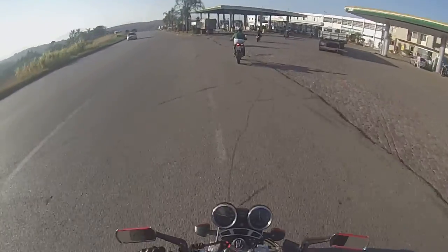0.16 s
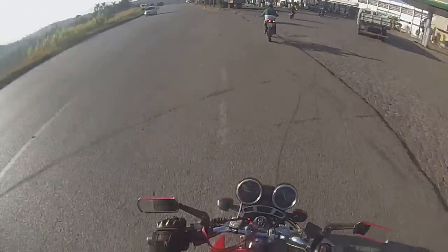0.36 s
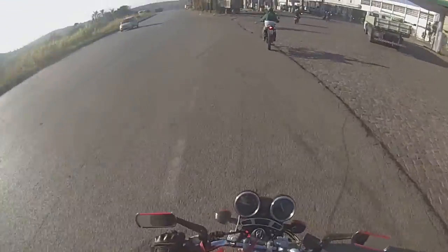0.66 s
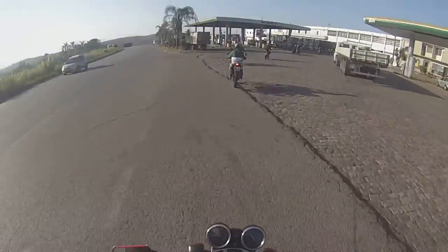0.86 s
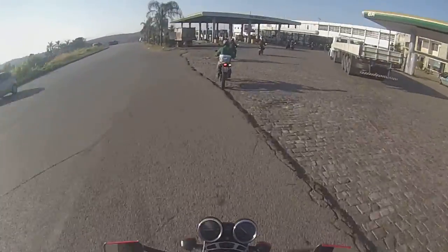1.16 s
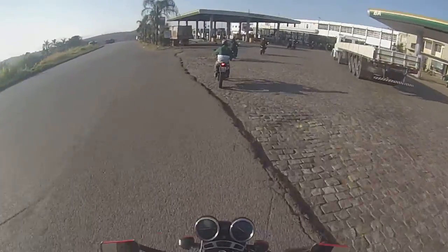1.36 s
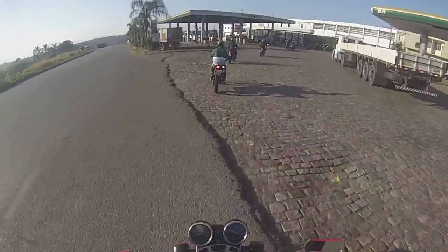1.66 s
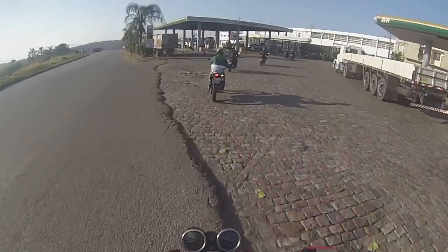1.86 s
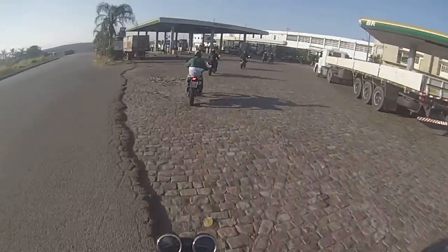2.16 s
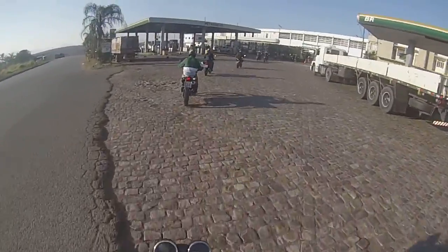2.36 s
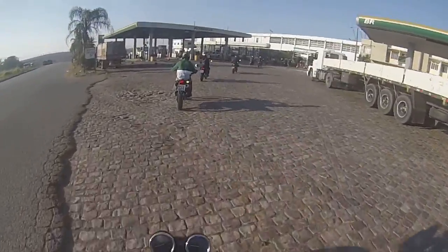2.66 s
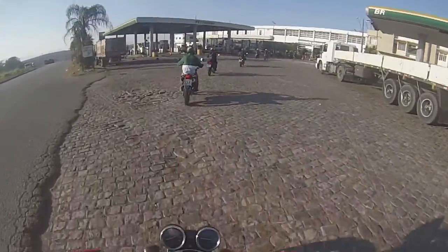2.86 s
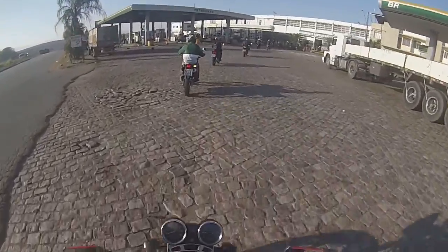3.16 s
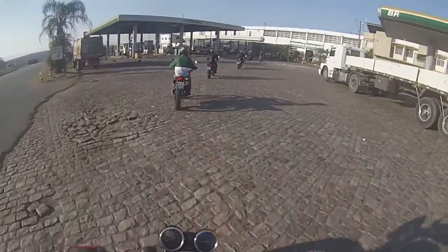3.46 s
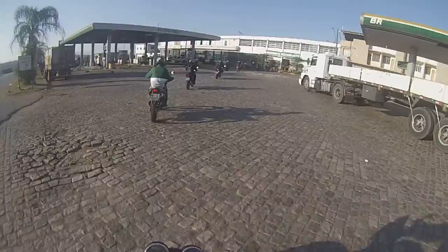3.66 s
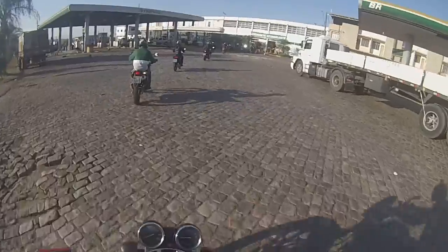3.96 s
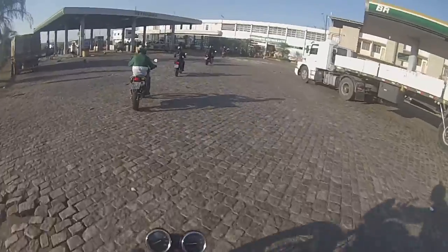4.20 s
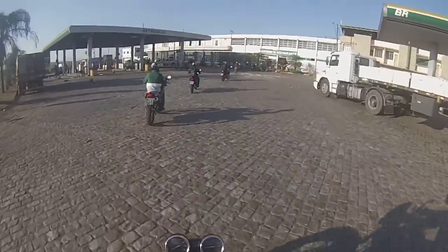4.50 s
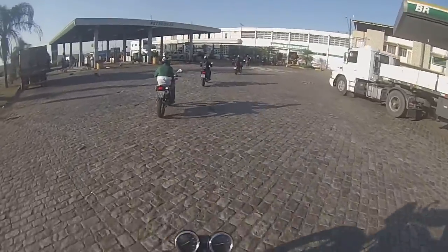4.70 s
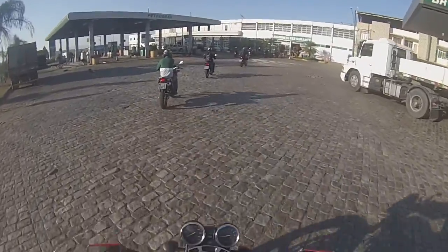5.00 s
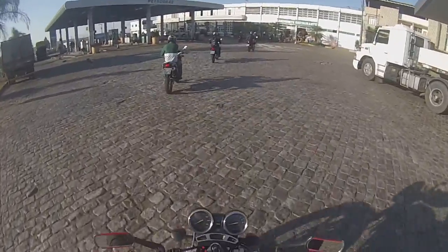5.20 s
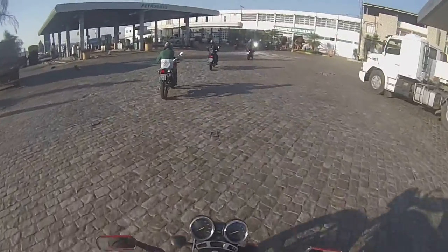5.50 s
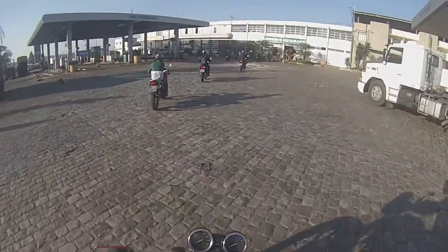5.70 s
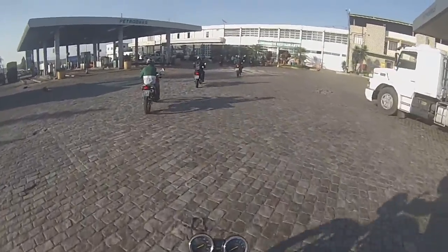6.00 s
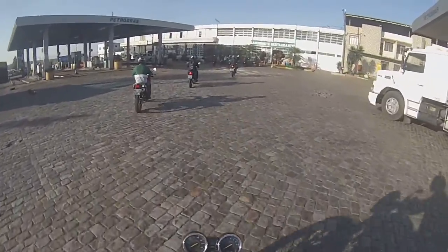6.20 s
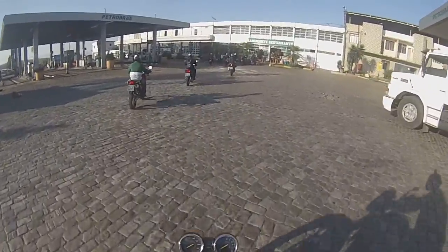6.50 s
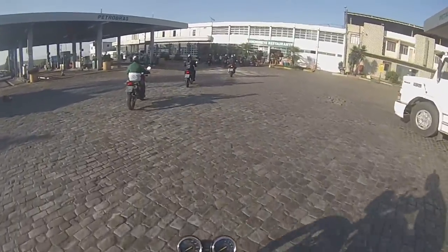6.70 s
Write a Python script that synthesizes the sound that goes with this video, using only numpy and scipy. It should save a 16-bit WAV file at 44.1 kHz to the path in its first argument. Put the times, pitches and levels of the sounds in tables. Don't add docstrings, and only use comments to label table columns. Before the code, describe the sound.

A motorcycle slows from smooth asphalt onto cobblestones, heard very close and muffled through a sealed camera housing on the helmet, with no room echo. At 0 s there is loud wind rush and a low, boomy engine hum, quickly weakening and sliding down in pitch. Around 0.7-1.8 s a car passes, its falling tyre whine over a broad roar; a dull knock lands near 1.2 s. The engine fades out between 2.1 and 2.4 s. Hollow wind tones keep blowing, with seam hiss. From about 1.7 s the stones shake the mount: low rumbling bumps, plastic ticks, thin metallic clinks and scuffs, densest around 2.2-2.9 and 3.3-4.1 s, with brief squeaky chirps, one strongest near 4.5 s. From 5 s the roll is slower, rattles sparser, and the wind becomes a higher, fluttering, pulsing whistle until the end near 7 s.

```python
import sys
import numpy as np
from scipy import signal
from scipy.fft import rfft, irfft, next_fast_len
from scipy.io import wavfile
from scipy.ndimage import uniform_filter1d

SR = 44100
rng = np.random.default_rng(int(sys.argv[2]) if len(sys.argv) > 2 else 0)


def gain_from_decibels(decibels):
    exponent = np.asarray(decibels, float) / 20
    return 10 ** exponent


def unload_audio(sound):
    columns = np.transpose(np.atleast_2d(sound))
    steps = np.round(np.clip(columns, -1, 1) * 32767)
    wavfile.write(sys.argv[1], SR, steps.astype(np.int16))


N = 302085
T = np.arange(N) / SR

# [multiple of the cycle, level/dB]
UPPER_ORDERS = [(5, -10), (6, -8), (8, -5), (9, -3), (10, -3), (11, -7), (12, -2), (13, -5), (15, -7)]
# [f/Hz, level/dB]
MOUNT_RESPONSE = [(70, -25), (80, -15), (85, -8), (90, -2.5), (97, 0), (113, -3.5), (122, -9), (132, -17),
                  (170, -24)]
# [f/Hz, level/dB per Hz]
HEAVE_SPECTRUM = [(3, -32), (6, -15), (14, 5), (27, 0.5), (40, -10.5), (55, -11), (70, -57)]
# [f/Hz, level/dB per Hz]
BOOM_SPECTRUM = [(45, -33), (60, -25), (78, 1), (95, 1), (110, -4), (130, -19), (155, -20.5), (200, -61)]
# [f/Hz, level/dB per Hz]
DRONE_SPECTRUM = [(88, -6), (150, -3), (193, -5), (225, -8), (281, 0.5), (354, -4), (440, -3), (520, -8.5),
                  (626, -8.5), (678, -7), (814, -7.5), (1000, -11.5), (1300, -4), (2200, -120)]
# [t/s, half length/s, heave level/dB, boom level/dB]
BUMPS = [(0, 0.27, -60, -24.5), (0.098, 0.089, -44, -40), (0.46, 0.11, -37, -27), (0.672, 0.21, -42.5, -39),
         (1.056, 0.078, -38.5, -50), (1.325, 0.097, -60, -29), (1.596, 0.24, -43.5, -32),
         (2.256, .1, -50, -40.5), (2.446, 0.21, -38, -40.5), (2.833, 0.074, -33, -35.5),
         (3.173, 0.064, -32, -48), (3.34, 0.24, -39, -45.5), (3.544, 0.044, -28.5, -40.5),
         (3.674, 0.054, -28.5, -42), (3.719, 0.039, -26, -39), (3.794, 0.028, -33, -34.5),
         (3.934, 0.038, -27, -38.5), (4.075, 0.028, -32.5, -52), (4.187, 0.064, -35.5, -37),
         (4.485, 0.039, -32, -43), (4.403, 0.036, -45, -42), (4.84, 0.032, -40, -39),
         (4.894, 0.2, -36.5, -40.5), (4.92, 0.031, -40, -39), (5.018, 0.043, -38, -41),
         (5.474, 0.035, -40, -42), (5.147, 0.077, -33.5, -52), (5.49, 0.64, -35, -50),
         (5.723, 0.07, -34.5, -37.5), (5.842, 0.081, -32, -55), (6.143, 0.074, -35, -43.5),
         (6.263, 0.024, -33, -52), (6.487, 0.029, -33.5, -34), (6.784, 0.22, -35.5, -45)]
# [t/s, half length/s, level/dB]
LULLS = [(2.49, 0.075, -4.5), (3.092, .04, -4), (3.448, 0.058, -1.5), (4.047, 0.033, -8), (4.583, .06, -1),
         (5.072, 0.024, -8), (5.17, .04, -3), (5.538, 0.064, -8), (5.922, 0.11, -3.5), (6.34, 0.057, -11),
         (6.607, 0.073, -5.5), (6.768, .025, -2)]
# [t/s, fast hiss share 0-1, slow cavity share 0-1]
PACE = [
    (0, 0.56, 0.43),
    (.45, 0.33, 0.3),
    (1.8, 0.07, 0.14),
    (4.9, 0.09, 0.57),
    (5.4, 0.0, 0.87),
    (6.85, 0.06, 0.96),
]
# [t/s, rush level/dB, blowing of the main cavity level/dB]
AIR = [(0, -43, -42), (.4, -51, -45.5), (.9, -45.5, -42), (1.12, -48.5, -39), (1.41, -46.5, -40),
       (1.66, -51, -42), (2.08, -52, -41.5), (2.33, -52.5, -42.5), (2.46, -54.5, -47), (2.9, -53, -47),
       (3.1, -54, -43), (3.38, -54.5, -42.5), (3.5, -58, -47), (3.79, -51.5, -49.5), (4.45, -55.5, -53.5),
       (4.83, -53, -50.5), (5.38, -55, -56), (6.2, -50.5, -55), (6.85, -49.5, -57.5)]
# [t/s, half length/s, level/dB]
GUSTS = [
    (0.435, 0.034, 5.5),
    (3.543, 0.0062, 6),
    (6.631, 0.0082, 5),
    (1.748, 0.024, 6),
    (3.207, 0.038, -2),
    (6.344, 0.034, -2.5),
    (6.77, 0.038, 5.5),
]
# [t/s, half length/s, level/dB]
PUFFS = [
    (5.484, .03, 4.5),
    (5.633, 0.02, 4),
    (5.682, 0.016, 2),
    (6.005, .02, -5),
    (6.09, 0.047, 1),
    (6.156, .015, -1),
    (6.23, 0.057, 2),
    (6.325, 0.033, -2.5),
    (6.47, 0.012, 4),
    (6.591, 0.061, -0.5),
]
# [f/Hz, width/Hz, level/dB]
SHOULDER_CAVITIES = [(1530, 223, 3), (1750, 144, 3.5)]
# [f/Hz, width/Hz, level/dB]
UPPER_CAVITIES_FAST = [(1934, 580, -2), (2226, 405, 3.5), (2495, 380, -8)]
# [f/Hz, width/Hz, level/dB]
UPPER_CAVITIES_SLOW = [(1520, 87, -12), (1856, 113, 2), (2031, 180, 4.5), (2475, 110, -19)]
# [f/Hz, level/dB per Hz]
HISS_FAST = [(1470, -50), (2500, -10), (2970, -4.5), (3230, -6), (3720, -6.5), (4040, -31), (4760, -5),
             (5700, -28), (6060, -6.5), (6340, -5.5), (7640, -18), (8880, -17.5), (10200, -25),
             (11800, -20), (15000, -35)]
# [f/Hz, level/dB per Hz]
HISS_SLOW = [(1500, -12), (2500, 0), (3000, -3), (3400, -3.5), (3800, -3), (4200, -5), (4650, -6.5),
             (4950, -9.5), (5350, -8.5), (5800, -14.5), (6500, -14), (8500, -25.5), (11200, -23.5),
             (15000, -45)]
# [f/Hz, t60/s, level/dB]
CHATTER_PARTS = [(3870, 0.044, -2.0), (4530, 0.025, 0.5), (5380, 0.0089, -1),
                 (6370, 0.012, -5.5), (6840, 0.014, -4), (11060, 0.011, -7.5)]
# [t/s, peak level/dB]
TICKS = [(0.2191, -64), (0.253, -54), (0.3288, -50), (0.4056, -60), (1.877, -60), (1.895, -59),
         (2.2674, -55), (2.3447, -54), (2.37, -50), (2.4036, -57), (2.618, -55), (2.7638, -61),
         (2.7767, -59), (2.7967, -57), (2.825, -51), (3.2634, -68), (3.2883, -57), (3.3265, -57),
         (3.3559, -53), (3.6256, -64), (3.6343, -52), (3.6581, -57), (3.893, -53), (3.9515, -50.5),
         (4.0764, -56), (5.091, -59), (5.1214, -57), (5.2975, -64.5), (5.7023, -59), (6.2484, -57)]
# [f/Hz, t60/s, level/dB]
TICK_COLOUR = [(8850, 0.0011, 10), (11400, 0.0027, -3), (12600, .0015, -5)]
# [t/s, tyre song f/Hz, song level/dB, roar level/dB]
CAR_PASS = [
    (.5, 2050, -60, -59.5),
    (.8, 1847, -49, -51.5),
    (1.0, 1790, -44.5, -54),
    (1.15, 1673, -57, -49.5),
    (1.35, 1548, -47, -50.5),
    (1.6, 1602, -48.5, -50.5),
    (1.85, 1534, -60, -52.5),
    (2.2, 1513, -70, -65),
]
# [f/Hz, level/dB per Hz]
CAR_ROAR = [(600, -42), (900, 7), (1050, 4.5), (1500, 7), (2400, -15), (3000, -4.5), (3600, -6.5),
            (4200, -22), (5000, -11.5), (6300, -36), (7500, -21)]
# [t/s, peak level/dB, f/Hz]
KNOCKS = [(1.203, -35, 1300), (2.212, -60, 5300), (2.268, -54, 5500), (2.8, -45, 2400), (2.803, -45, 2000),
          (3.538, -41, 1330), (3.89, -49, 2350), (4.53, -57, 3400), (6.25, -53, 2650), (6.55, -55, 680),
          (6.61, -56, 680), (6.626, -43, 2000), (6.775, -55, 670)]
# [t/s, half length/s, level/dB]
FLURRIES = [(1.3, .1, -3), (1.58, .06, -8), (2.27, 0.016, 0), (2.362, 0.05, 1), (2.63, .02, 0),
            (2.793, 0.033, -3), (2.983, .015, 0), (3.352, 0.05, 0), (3.486, 0.013, -6), (3.707, 0.09, 2),
            (3.926, .05, 4), (4.44, .02, -2), (5.108, 0.033, -5), (5.697, .03, -1), (5.782, .02, 0),
            (6.242, 0.035, -4), (6.748, .05, -8)]
# [f/Hz, t60/s, level/dB]
FLURRY_PARTS = [(6400, .004, 7), (7000, .004, -2), (8100, .003, -15), (9300, .003, -2), (11000, .004, -4),
                (13000, .002, -9)]
# [t/s, peak level/dB]
CLINKS = [(1.355, -61), (1.638, -55), (1.689, -44), (1.785, -53), (3.327, -46), (3.494, -48), (3.746, -52),
          (3.836, -49), (3.891, -46), (3.978, -49), (4.026, -49), (4.141, -55), (4.445, -47),
          (4.462, -54.5), (4.487, -51), (4.588, -47), (4.603, -45), (4.809, -57), (4.885, -47), (4.9, -50),
          (5.22, -49), (5.299, -47), (5.587, -49), (5.703, -49), (5.759, -47), (5.916, -55), (6.381, -56),
          (6.571, -57), (6.735, -45.5), (2.2694, -51), (2.695, -56), (2.7977, -50), (2.8362, -54),
          (3.6563, -57), (3.8124, -56), (3.9242, -55), (3.9496, -53), (4.0768, -50), (4.1157, -55.5),
          (4.2674, -57), (4.4056, -54), (4.6485, -55), (4.7857, -51), (5.104, -54), (5.4293, -53),
          (6.1322, -58), (6.2374, -52), (6.7114, -50)]
# [t/s, peak level/dB]
TINKS = [(1.5626, -48), (1.6924, -55), (1.8286, -50), (1.8605, -57), (1.9234, -55), (1.9678, -57),
         (2.1359, -59.5), (2.1798, -48), (2.2377, -45), (2.2716, -46), (2.3165, -50), (2.4596, -49),
         (2.531, -53), (2.6607, -54), (2.6948, -59), (2.7704, -52), (3.2658, -60), (3.3621, -51),
         (3.5936, -52), (3.8934, -57), (4.6247, -52), (4.677, -57), (2.5069, -58), (2.882, -60),
         (3.0033, -56), (3.0941, -57), (3.1894, -62), (3.289, -56.5), (3.9267, -56), (4.8102, -60),
         (4.893, -58), (5.2227, -58.5), (5.3, -57), (5.355, -58), (5.5201, -57), (5.6298, -59),
         (5.6877, -54), (6.0553, -62), (6.3008, -60), (6.7533, -60), (6.7882, -60), (4.9467, -55),
         (5.9993, -47), (6.2297, -51.5), (6.4144, -61), (6.4815, -61), (6.5488, -51), (6.6471, -51)]
# [t/s, level/dB, f/Hz, length/s]
SQUEAKS = [
    (1.73, -67, 7900, 0.018),
    (2.355, -61, 8050, 0.012),
    (2.453, -66, 7140, 0.033),
    (5.663, -64, 7000, 0.033),
]
# [t/s, peak level/dB]
SCUFFS = [(1.829, -58), (2.2377, -49), (2.2671, -56), (2.316, -51.5), (2.4492, -53), (2.5305, -62),
          (2.661, -58), (2.7699, -55), (2.7987, -44), (3.3262, -51), (3.4846, -49), (3.678, -42),
          (3.745, -46), (3.8844, -47.5), (5.219, -55.5), (5.625, -51), (5.702, -45), (5.9996, -60),
          (6.548, -68), (6.7489, -53)]
# [t/s, peak level/dB, knock against thud level/dB]
JOLTS = [(2.377, -47, -5), (2.79, -49, 9.5), (2.82, -56, -9), (3.522, -50, -13), (3.656, -48.5, 6),
         (3.717, -52, 1), (3.791, -48, 7), (3.928, -59, 14), (4.157, -47.5, 2), (4.188, -69, 4),
         (4.904, -47, -6), (5.718, -53, -0.5), (6.465, -60, -4)]
# [t/s, peak level/dB]
CHIRPS = [(2.682, -43), (2.845, -40.5), (2.885, -44), (3.153, -41), (3.747, -37), (3.782, -41),
          (3.841, -39), (3.945, -43), (4.012, -43), (4.528, -35.5), (4.841, -41), (6.043, -44)]
# [f/Hz, level/dB per Hz]
SELF_NOISE = [(4000, -16), (6000, -2.5), (8000, -4), (11000, -11), (13500, -11), (15200, -16), (15400, -40)]


def rms_one(x):
    return x / np.sqrt(np.mean(x ** 2) + 1e-20)


def in_time(rows):
    s, *columns = np.transpose(rows)
    return [np.interp(T, s, column) for column in columns]


def hump(at_s, half_s):
    out, half_s = np.zeros(N), max(half_s, .008)
    near = slice(max(round((at_s - 4 * half_s) * SR), 0), round((at_s + 4 * half_s) * SR))
    out[near] = np.exp(-((T[near] - at_s) / half_s) ** 2)
    return out


def swells_db(rows):
    return sum(db * hump(s, half_s) for s, half_s, db in rows)


def coloured(spectrum):
    size = next_fast_len(N)
    hz, db = np.transpose(spectrum)
    bins_hz = np.arange(size // 2 + 1) * SR / size + 1e-3
    shape_db = np.interp(np.log(bins_hz), np.log(hz), db, left=-150, right=-150)
    return rms_one(irfft(rfft(rng.standard_normal(size)) * gain_from_decibels(shape_db), size)[:N])


def evened(x, span_s, share):
    swell = np.sqrt(uniform_filter1d(x ** 2, round(span_s * SR)) + 1e-4)
    return rms_one(x / swell ** share)


def drift(rate):
    r = np.exp(-80 * np.pi * rate / SR)
    slow = signal.lfilter([1], [1, -2 * r, r * r], rng.standard_normal(N // 40 + 2002))[2000:]
    return np.interp(np.arange(N) / 40, np.arange(len(slow)), rms_one(slow - slow.mean()))


def cavity(hz, width_hz):
    sos = signal.butter(2, width_hz / 2, fs=SR, output="sos")
    a, b = signal.sosfilt(sos, rng.standard_normal((2, N + 4000)))[:, 4000:]
    turn = 2 * np.pi * np.cumsum(np.broadcast_to(hz, N)) / SR
    return rms_one(a * np.cos(turn) + b * np.sin(turn))


def cavities(modes):
    return rms_one(sum(gain_from_decibels(db) * cavity(hz, width_hz) for hz, width_hz, db in modes))


def ring(clicks, hz, t60):
    r, w = gain_from_decibels(-60 / (t60 * SR)), 2 * np.pi * hz / SR
    return signal.lfilter([0, np.sin(w)], [1, -2 * r * np.cos(w), r * r], clicks + 1e-18)


def strikes(times, db):
    clicks = np.zeros(N)
    clicks[np.round(np.asarray(times) * SR).astype(int)] = gain_from_decibels(db)
    return clicks


def ring_parts(clicks, parts, level_db):
    dealt = rng.integers(0, len(parts), N)
    return sum(gain_from_decibels(level_db + db) * ring(clicks * (dealt == k), hz, t60)
               for k, (hz, t60, db) in enumerate(parts))


def rattle(events, hz, width_hz, rise_s, length_s, level_db):
    s, db = np.transpose(events)
    t = np.arange(round(length_s * SR)) / SR
    touch = np.minimum(t / rise_s, 1) * np.cos(np.pi / 2 * t / length_s)
    tone = cavity(hz, width_hz)
    steadied = tone / (np.abs(signal.hilbert(tone, next_fast_len(N))[:N]) + .5)
    return 0.67 * steadied * signal.fftconvolve(strikes(s, db + level_db), touch)[:N]


def engine():
    idle_hz, knee_hz = 20.6, .6
    sagging_hz, held_hz, blip_hz = 41.4 - 9.5 * T, 36.4, 48.6 - 37 * T
    hanging_hz = -knee_hz * np.logaddexp(-sagging_hz / knee_hz, -held_hz / knee_hz)
    above_idle_hz = np.maximum(hanging_hz, blip_hz) - idle_hz
    cycle_hz = idle_hz + knee_hz * np.logaddexp(0, above_idle_hz / knee_hz)
    turn = 2 * np.pi * np.cumsum(cycle_hz) / SR

    load_db = 7 * np.exp(-T / .2)
    mount_hz, mount_db = np.transpose(MOUNT_RESPONSE)
    third_db = -38.5 + np.interp(3 * cycle_hz, mount_hz, mount_db) + load_db
    fourth_db = -42.5 + np.interp(4 * cycle_hz, mount_hz, mount_db)
    uneven = gain_from_decibels(.8 * drift(8) - .7)
    out = uneven * (gain_from_decibels(third_db) * np.sin(3 * turn) + gain_from_decibels(fourth_db) * np.sin(4 * turn + 1))

    upper_db = -58 + 14 * np.log2(np.minimum(cycle_hz / 35, 1)) + load_db
    for order, db in UPPER_ORDERS:
        order_hz = order * cycle_hz
        passed_db = -.1 * np.maximum(order_hz - 450, 0) - .1 * np.clip(310 - order_hz, 0, 60)
        level_db = upper_db + db + passed_db + 2.5 * drift(5)
        out += gain_from_decibels(level_db) * np.sin(order * turn + .6 * drift(4))
    clutch = np.clip((2.4 - T) / 0.3, 0, 1)
    return np.sqrt(2) * out * clutch


def road():
    cobbles = np.clip((T - 1.72) / 0.86, 0, 1)
    heave = gain_from_decibels(-51 + 9 * cobbles)
    calm_boom = gain_from_decibels(-36.5 - 9.5 * cobbles)
    drone = gain_from_decibels(-53.5 - 2 * cobbles)
    boom = calm_boom
    for s, half_s, heave_db, boom_db in BUMPS:
        swell = hump(s, half_s)
        heave = np.maximum(heave, gain_from_decibels(heave_db) * swell)
        boom = np.maximum(boom, gain_from_decibels(boom_db) * swell)
    lull = gain_from_decibels(swells_db(LULLS))
    heave = heave * lull ** 0.2
    boom = boom * lull
    drone = drone * (boom / calm_boom) ** 0.13 * gain_from_decibels(9 * in_time(PACE)[0])

    lumps_db = 0.36 * drift(5.1)
    thumps = evened(coloured(BOOM_SPECTRUM), 0.08, 0.75) * gain_from_decibels(2.5 * cobbles * drift(9))
    boom = boom * gain_from_decibels(-1.5 - 12.5 * (1 - cobbles) + lumps_db) * thumps

    full = coloured(DRONE_SPECTRUM)
    thin = rms_one(signal.sosfilt(signal.butter(1, 180, "high", fs=SR, output="sos"), full))
    hum = thin + cobbles * (full - thin)
    hum = hum + 0.3 * (1 - cobbles) * cavity(470, 120) + 0.38 * cobbles * cavity(305, 70)
    drone = drone * gain_from_decibels(0.89 * lumps_db) * hum
    return heave * evened(coloured(HEAVE_SPECTRUM), 0.167, 1.0) + boom + drone


def wind():
    flutter_db, buffet_db, throb_db = 0.67, 1.9, 1.65
    fast, slow = in_time(PACE)
    upper_db, main_db = in_time(AIR)
    gusts_db = swells_db(GUSTS)
    upper_db, main_db = upper_db + gusts_db, main_db + gusts_db
    rush_db, blown_db = upper_db + 53, main_db + 47
    gust = drift(9.0)
    widening = hump(3.2, .36)
    throb = throb_db * slow * np.cos(2 * np.pi * 6.15 * (T - 6.095))

    main_hz = 1307.4 + 2.0 * blown_db - 15 * slow + 38 * widening
    main = (0.97 - 0.2 * slow) * cavity(main_hz, 147)
    main += (0.36 + 0.15 * slow) * cavity(main_hz, 55)
    main += gain_from_decibels(-10 - 1.6 * slow) * cavity(1120, 134)
    out = gain_from_decibels(main_db - 0.97 + flutter_db * (.5 * gust + drift(38))) * main

    (low_hz, low_width, low_db), (high_hz, high_width, high_db) = SHOULDER_CAVITIES
    shoulder = gain_from_decibels(low_db) * cavity(low_hz, low_width)
    shoulder = shoulder + gain_from_decibels(high_db - 9.3 * slow) * cavity(high_hz, high_width)
    shoulder_db = -51.5 + 0.071 * rush_db + 0.43 * blown_db + 3.8 * widening
    out += gain_from_decibels(shoulder_db - 7.5 + flutter_db * (.5 * gust + drift(25))) * shoulder

    walking = 0.8 * cavities(UPPER_CAVITIES_SLOW) + 0.5 * cavity(2035 + 30 * drift(4.96), 49)
    upper = np.sqrt(1 - slow) * cavities(UPPER_CAVITIES_FAST) + np.sqrt(slow) * walking
    upper_db = upper_db - 1.86 + 0.67 * throb + swells_db(PUFFS)
    out += gain_from_decibels(upper_db + buffet_db * (0.09 * gust + 0.67 * drift(42))) * upper

    banded = np.maximum(fast, 0.21 * np.clip((1.85 - T) / 0.21, 0, 1))
    hiss = np.sqrt(banded) * coloured(HISS_FAST) + np.sqrt(1 - banded) * coloured(HISS_SLOW)
    hiss += slow * gain_from_decibels(-12) * cavity(5270, 370)
    hiss_db = -62 + 0.39 * rush_db + 30 * fast ** 2
    return out + gain_from_decibels(hiss_db - 2.5 + throb + buffet_db * (0.24 * gust + 0.78 * drift(55))) * hiss


def chatter():
    busy = np.clip((T - 1.4) / 0.74, .1, 1) * gain_from_decibels(5.4 * drift(6))
    hits = rng.random(N) < 140 * busy / SR
    clicks = hits * gain_from_decibels(3.5 * np.minimum(rng.exponential(1, N), 2.5))
    return ring_parts(clicks, CHATTER_PARTS, -65.5)


def ticks():
    s, db = np.transpose(TICKS)
    contact = np.hanning(round(0.004 * SR))
    colour_db = 3.5 * rng.standard_normal((len(s), 3))
    noise, out = rng.standard_normal((3, N)), np.zeros(N)
    bright = signal.butter(2, 7500, "high", fs=SR, output="sos")
    for k, (hz, t60, level_db) in enumerate(TICK_COLOUR):
        clicks = strikes(s, db - 20.5 + level_db + colour_db[:, k])
        burst = signal.fftconvolve(clicks, contact)[:N] * noise[k]
        out += signal.sosfilt(bright, ring(burst, hz, t60))
    return out


def passing_car():
    song_hz, song_db, roar_db = in_time(CAR_PASS)
    song = 0.85 * cavity(song_hz, 98) + 0.45 * cavity(song_hz, 35)
    return gain_from_decibels(song_db) * song + gain_from_decibels(roar_db) * coloured(CAR_ROAR)


def knocks():
    return sum(ring(strikes([s], db), hz, .04) for s, db, hz in KNOCKS)


def flurries():
    shake = sum(gain_from_decibels(db) * hump(s, half_s) for s, half_s, db in FLURRIES)
    sizes = shake * gain_from_decibels(3.5 * np.minimum(rng.exponential(1, N), 2.5))
    clicks = (rng.random(N) < 500 / SR) * sizes
    return ring_parts(clicks, FLURRY_PARTS, -63)


def clinks():
    return rattle(CLINKS, 3790, 200, rise_s=0.0054, length_s=0.024, level_db=-4.5)


def tinks():
    return rattle(TINKS, 4606, 67, rise_s=0.0013, length_s=0.014, level_db=0.67)


def squeaks():
    out = np.zeros(N)
    for s, db, hz, length_s in SQUEAKS:
        t = np.arange(round(length_s * SR)) / SR
        tone = np.sin(2 * np.pi * hz * t) + 0.12 * np.sin(4 * np.pi * hz * t)
        out[round(s * SR):][:len(t)] += gain_from_decibels(db) * np.sqrt(np.sin(np.pi * t / length_s)) * tone
    return out


def scuffs():
    s, db = np.transpose(SCUFFS)
    rub = np.hanning(round(0.01 * SR))
    puffs = signal.fftconvolve(strikes(s, db - 6.0), rub)[:N] * rng.standard_normal(N)
    broad = signal.sosfilt(signal.butter(3, [1900, 7300], "band", fs=SR, output="sos"), puffs)
    low = signal.sosfilt(signal.butter(2, [1900, 3000], "band", fs=SR, output="sos"), puffs)
    return broad + 4.6 * low


def jolts():
    s, db, knock_db = np.transpose(JOLTS)
    thud = ring(strikes(s, db - 0.68), 158, 0.26)
    knock = ring(strikes(s, db + knock_db + 4.4), 320, 0.052)
    blow = np.hanning(round(0.0026 * SR))
    return np.convolve(thud + knock, blow / blow.sum())[:N]


def latch_chirps():
    return rattle(CHIRPS, 2420, 125, rise_s=0.0013, length_s=0.018, level_db=-0.59)


def scene():
    mount = engine() + road() + jolts()
    air = wind() + passing_car()
    metal = clinks() + tinks() + latch_chirps()
    small = chatter() + ticks() + knocks() + flurries() + squeaks() + scuffs()
    return (mount + air + metal + small)[None]


def low_pass(x):
    return signal.sosfilt(signal.butter(12, 15230, fs=SR, output="sos"), x)


def record(dry):
    noisy = dry + gain_from_decibels(-73) * coloured(SELF_NOISE)
    return low_pass(noisy)


dry = scene()
out = record(dry)
unload_audio(out)
```